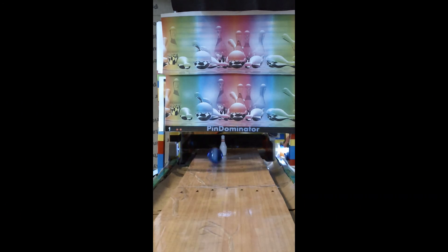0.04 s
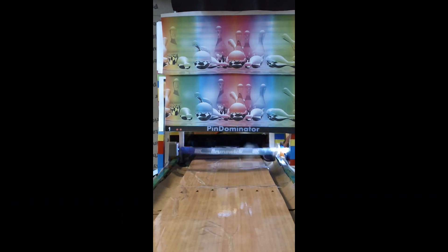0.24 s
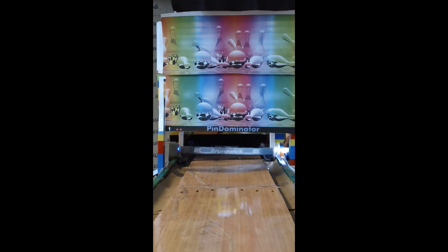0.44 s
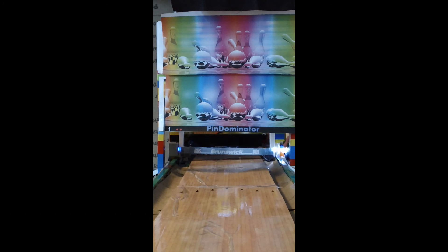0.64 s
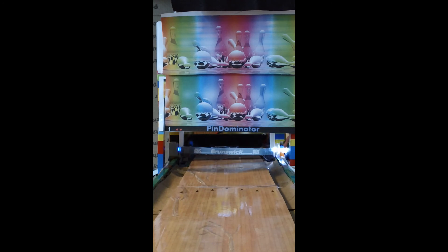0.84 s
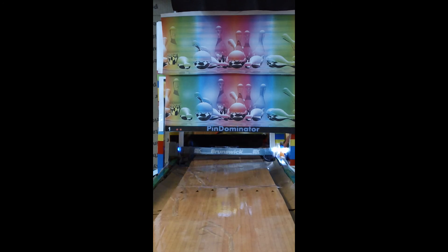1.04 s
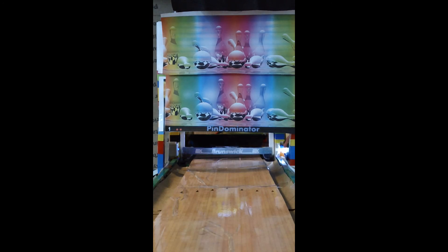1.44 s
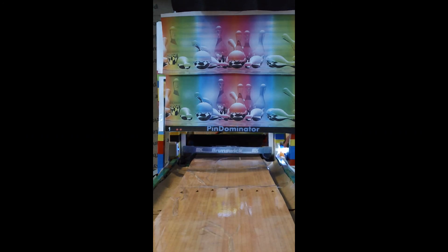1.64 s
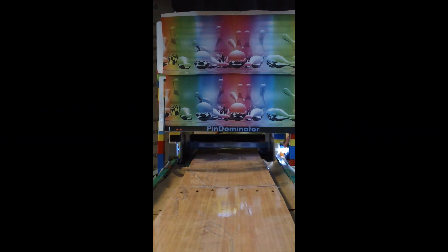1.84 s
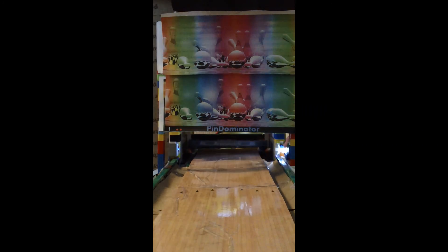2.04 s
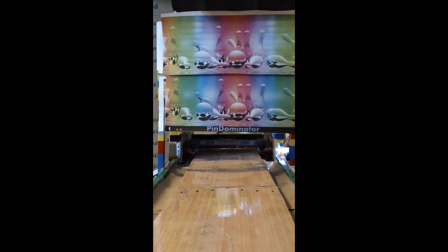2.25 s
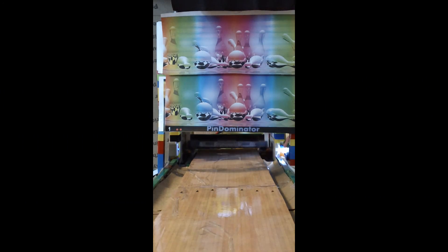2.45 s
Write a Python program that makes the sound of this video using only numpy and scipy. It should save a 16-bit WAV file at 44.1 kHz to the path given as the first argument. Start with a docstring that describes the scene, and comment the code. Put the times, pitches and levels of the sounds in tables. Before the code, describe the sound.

Small pins clack and tumble as a ball strikes them on a toy bowling lane. Next a sweeper knocks down, scrapes along and clicks back into place, shaking the hollow plastic frame. The sound is close, with a short room echo.

```python
"""In a small room, a small ball knocks down the pins of a model bowling lane built of plastic bricks.
Pins clack together and tumble on the wooden deck, and the ball rumbles into the pit.
Then a rake drops, sweeps the deck and latches back, shaking the loose bricks of the frame.
Each hit is a fading tone, a burst of noise or both; rolling and sliding are streams of tiny taps.
The hollow frame rings along, the room adds a short echo, and a soft hiss lies underneath."""
import sys
import numpy as np
from scipy import signal
from scipy.fft import rfft, irfft, next_fast_len
from scipy.io import wavfile
from scipy.ndimage import uniform_filter1d

SR = 44100
rng = np.random.default_rng(int(sys.argv[2]) if len(sys.argv) > 2 else 0)


def generate_wav(sig):
    """Save sig (samples, or channels by samples) to the path in sys.argv[1] as 16-bit PCM at SR."""
    pcm = np.round(np.clip(np.atleast_2d(sig).T, -1, 1) * 32767).astype(np.int16)
    wavfile.write(sys.argv[1], SR, pcm)


N = 110250
AGE = np.arange(8192) / SR  # seconds since a hit began


def from_db(db):
    """Turn decibels into a number to multiply a sound by."""
    return 10 ** (np.asarray(db) / 20)


def unit_level(x):
    """Scale a long sound to an average (rms) level of 1."""
    return x / np.sqrt(np.mean(x ** 2) + 1e-20)


def unit_hit(x):
    """Give a hit the energy of 10 ms of sound at level 1."""
    return x / np.sqrt(np.sum(x ** 2) / (.01 * SR) + 1e-20)


def fade(t60, age=AGE):
    """A fade that falls by 60 dB every t60 seconds."""
    return from_db(-60 * age / t60)


def colour(x, tone):
    """Turn frequencies up or down along a curve of (frequency [Hz], gain [dB]) points."""
    size = 2 * next_fast_len(len(x))
    hz, db = np.transpose(tone)
    grid = np.maximum(np.arange(size // 2 + 1) * SR / size, 1)
    gain = from_db(np.interp(np.log(grid), np.log(hz), db))
    cepstrum = irfft(np.log(gain))
    # keep the filter from sounding before the hit (minimum phase)
    cepstrum[1:size // 2] *= 2
    cepstrum[size // 2 + 1:] = 0
    return irfft(rfft(x, size) * np.exp(rfft(cepstrum)), size)[:len(x)]


def add(out, start_s, sound):
    """Mix a sound in at its start time."""
    i = max(int(start_s * SR), 0)
    out[i:i + len(sound)] += sound[:max(N - i, 0)]


def ring(hz, t60, swell_s=.0001):
    """One pure tone of a struck object: it swells quickly, then fades."""
    return np.sin(2 * np.pi * hz * AGE) * fade(t60) * (1 - np.exp(-AGE / swell_s))


def burst(tone, t60, crack_db=-3):
    """The crack of first contact, then a fading shower of tiny taps."""
    taps = np.sign(rng.standard_normal(len(AGE)))
    loudness = fade(t60) + from_db(crack_db) * fade(t60=.026)
    return unit_hit(colour(taps * loudness, tone))


# tone of the background hiss: (frequency [Hz], gain [dB])
HISS_TONE = [(25, -9), (60, 4.5), (100, 0), (130, 7), (175, -4), (1960, -14.5), (9020, -22.5),
             (15000, -29.5)]


def hiss(start_db=-51, rise_db=5.5, rise_s=(.73, 1.94)):
    """A soft background hiss that grows once the mechanism runs."""
    rise = np.interp(np.arange(N) / SR, rise_s, (0, rise_db))
    return from_db(start_db + rise) * unit_level(colour(rng.standard_normal(N), HISS_TONE))


# ball and pins rolling, rake sliding: (time [s], rumble level [dB], scrape level [dB])
ROLLING_LEVELS = [(0, -32.5, -42), (.08, -54, -68), (.16, -53, -59), (.2, -37.5, -40),
                  (0.282, -22.5, -25.5), (.38, -38.5, -75), (.52, -38.5, -33), (0.704, -39.5, -39.5),
                  (.76, -49, -57), (.95, -30.5, -37), (1.07, -34.5, -39), (1.21, -52.5, -73),
                  (1.37, -39.5, -36.5), (1.44, -40, -61), (1.648, -47, -49.5), (1.756, -29.5, -33),
                  (1.92, -44, -48.5), (1.99, -37.5, -43), (2.13, -41, -44), (2.24, -32, -33.5),
                  (2.33, -46, -67)]
# tones of the lane's rumble and the plastic's scrape: (frequency [Hz], gain [dB])
RUMBLE_TONE = [(60, -27), (105, -12.5), (150, 4.5), (220, 1), (550, 1), (900, -11.5), (2000, -40.5)]
SCRAPE_TONE = [(350, -36.5), (800, 16), (1500, 4.5), (4300, -4), (6500, -12.5), (15000, -60)]


def rolling(taps_per_s=1200, spread_db=4.5):
    """Rolling and sliding: many tiny taps make the lane rumble and the plastic scrape."""
    times, rumble_db, scrape_db = np.transpose(ROLLING_LEVELS)
    out = np.zeros(N)
    for level_db, tone in ((rumble_db, RUMBLE_TONE), (scrape_db, SCRAPE_TONE)):
        sizes = from_db(spread_db * np.minimum(rng.exponential(1, N), 4)) * rng.choice([-1, 1], N)
        taps = sizes * (rng.random(N) < taps_per_s / SR)
        loudness = from_db(np.interp(np.arange(N) / SR, times, level_db))
        out += loudness * unit_level(colour(taps, tone))
    return out


# hard plastic hitting hard plastic: (time [s], pitch [Hz], level [dB])
CLACK_HITS = [(0.1092, 9700, -47), (0.1909, 4900, -30), (0.2898, 4540, -21.5), (.290, 2400, -19.5),
              (.302, 4130, -34), (0.3463, 4540, -25), (.366, 4440, -34), (.387, 5400, -31.5),
              (.399, 4750, -25), (0.464, 1500, -27.5), (0.4858, 4190, -33), (0.53, 4900, -39),
              (.565, 5580, -43.5), (.587, 2050, -39.5), (.601, 1690, -39.5), (0.624, 4300, -40),
              (.654, 1650, -47), (.806, 3850, -47), (.834, 2850, -42), (0.9106, 3290, -20.5),
              (1.122, 4640, -39), (1.347, 3500, -42), (1.364, 3270, -45), (1.689, 4170, -44),
              (1.733, 4200, -39), (1.862, 2600, -44), (1.9863, 4500, -43), (2.2098, 4260, -25.5),
              (2.495, 5960, -28)]
# the tones that ring in one clack: (multiple of the pitch, level [dB])
CLACK_RINGS = [(0.892, 0), (0.997, 0), (1.154, -3)]
# tone of the snap as the parts touch: (frequency [Hz], gain [dB])
SNAP_TONE = [(300, -9), (4500, 0), (8500, -6.5), (11500, -9), (15000, -12.5)]


def clacks(snap_db=-7.5):
    """Pins, ball and bricks meet with a dry snap and a very short ring."""
    out = np.zeros(N)
    for start_s, hz, db in CLACK_HITS:
        ringing = sum(from_db(ring_db) * rng.choice([-1, 1]) * ring(hz * ratio, t60=.0085)
                      for ratio, ring_db in CLACK_RINGS)
        noise = np.sign(rng.standard_normal(len(AGE)))
        snap = colour(noise * fade(t60=.04), SNAP_TONE)
        add(out, start_s, from_db(db) * (unit_hit(ringing) + from_db(snap_db) * unit_hit(snap)))
    return out


# blows on the deck and frame:
# (time [s], thud pitch [Hz], thud [dB], wood knock [dB], brick rattle [dB], bright chatter [dB])
DECK_BLOWS = [(.182, 164, -35, -51, -62, -62), (.275, 281, -22.5, -29, -28.5, -30.5),
              (.285, 231, -21.5, -20, -21.5, -32.5), (.345, 470, -46, -27.5, -22.5, -41),
              (.387, 403, -18.5, -30, -28, -25.5), (0.3983, 403, -17, -20, -21, -30),
              (.421, 350, -23.5, -53, -51, -59), (0.4652, 276, -33, -23, -35, -51),
              (.486, 446, -16, -22, -24, -40), (.564, 820, -33, -34, -33.5, -54),
              (.624, 815, -28.5, -31, -61, -71), (.834, 382, -18, -22, -28.5, -37),
              (.846, 438, -21, -43, -27, -40), (.884, 462, -25.5, -53, -31, -45),
              (0.9104, 483, -17.5, -15.5, -24, -40), (.921, 518, -28, -26, -20, -31.5),
              (.978, 398, -31.5, -29, -28.5, -29), (.988, 415, -20.5, -29, -23.5, -28),
              (1.012, 338, -28, -33, -24, -42), (1.067, 543, -32.5, -25.5, -29.5, -33.5),
              (1.122, 717, -25, -32.5, -36.5, -37.5), (1.376, 723, -29.5, -45, -37.5, -42.5),
              (1.392, 695, -27, -21, -24, -36.5), (1.407, 428, -27.5, -52, -28.5, -36.5),
              (1.481, 231, -40.5, -39, -39, -68), (1.708, 372, -47, -40, -38, -43),
              (1.741, 433, -28.5, -38.5, -44, -47.5), (1.788, 304, -29.5, -46, -49, -46),
              (2.009, 299, -34, -39, -58, -55), (2.055, 559, -27, -39.5, -50, -65),
              (2.1807, 568, -28, -32, -32.5, -51), (2.196, 445, -26, -26, -37, -46),
              (2.210, 212, -33, -23.5, -27.5, -43.5)]
# how the deck shakes around a thud's pitch: (multiple of the pitch, gain [dB])
DECK_TONE = [(.15, -49), (.7, -2), (1, -3.5), (1.5, -3.5), (2.6, -45.5)]
# tones of the wood knock, brick rattle and bright chatter: (frequency [Hz], gain [dB])
KNOCK_TONE = [(350, -24.5), (650, 8.5), (820, 4.5), (1600, 1.5), (2400, -11.5), (5000, -44.5)]
RATTLE_TONE = [(100, -9), (700, 1.5), (1900, 2.5), (2500, 5), (3400, 0), (5000, -1), (7000, -24.5)]
CHATTER_TONE = [(3500, -16), (6200, -2), (9200, 1), (10500, -6.5), (12000, -24), (15000, -11)]


def blows(shake_db=-1):
    """Each blow makes the wooden deck thud and knock, and the loose bricks rattle."""
    out = np.zeros(N)
    for start_s, hz, thud_db, knock_db, rattle_db, chatter_db in DECK_BLOWS:
        note = unit_hit(ring(hz, t60=.044, swell_s=.0024))
        shake = burst([(hz * ratio, db) for ratio, db in DECK_TONE], t60=.057)
        thud = from_db(thud_db) * unit_hit(note + from_db(shake_db) * shake)
        knock = from_db(knock_db) * burst(KNOCK_TONE, t60=.077)
        rattle = from_db(rattle_db) * burst(RATTLE_TONE, t60=.081)
        chatter = from_db(chatter_db) * burst(CHATTER_TONE, t60=.15)
        add(out, start_s, thud + knock + rattle + chatter)
    return out


# small hard parts, probably metal, left ringing: (time [s], pitch [Hz], level [dB])
TINK_HITS = [(.191, 9100, -33.5), (.399, 10060, -27), (0.442, 9050, -34.5), (.528, 9040, -45.5),
             (.586, 9370, -52), (.921, 6520, -32.5), (0.979, 8860, -27), (1.757, 6800, -52),
             (1.802, 6900, -47), (2.123, 9180, -51), (2.151, 9000, -47.5)]


def tinks(pitch_spread=.036, tone_count=24):
    """Small parts ring with high tones so close together that they shimmer as they fade."""
    out = np.zeros(N)
    for start_s, hz, db in TINK_HITS:
        ringing = sum(rng.normal() * ring(hz * (1 + pitch_spread * rng.triangular(-1, 0, 1)), t60=.14)
                      for _ in range(tone_count))
        add(out, start_s, from_db(db) * unit_hit(ringing))
    return out


# the notes of the hollow frame and lane: (pitch [Hz], gain [dB])
FRAME_NOTES = [(130, -2.5), (210, -7), (291, 0), (367, -18), (468, -2), (1389, -1.5), (2467, -22)]


def frame(x, t60=.067):
    """The hollow frame rings along with whatever strikes it."""
    out = x.copy()
    kept = fade(t60, 1 / SR)  # share of the ring left after one sample
    feed_in = np.array([1, 0, -1]) * (1 - kept ** 2) / 2
    for hz, db in FRAME_NOTES:
        feedback = [1, -2 * kept * np.cos(2 * np.pi * hz / SR), kept ** 2]
        out += from_db(db) * signal.lfilter(feed_in, feedback, x)
    return out


def even_noise(loudness, passes=4):
    """Noise that follows a loudness curve, with no frequency standing out."""
    noise = rng.standard_normal(len(loudness)) * loudness
    for _ in range(passes):
        flat = irfft(np.exp(1j * np.angle(rfft(noise))), len(loudness))  # all frequencies equally strong
        local_power = np.abs(uniform_filter1d(flat ** 2, size=128))
        noise = loudness * flat / np.sqrt(local_power + 1e-20)
    return noise


# tone of the room's echo: (frequency [Hz], gain [dB])
ECHO_TONE = [(500, -8), (1500, -6.5), (9000, -2)]


def room(x, low_t60=.241, high_t60=.21, split_hz=4240, swell_s=.0055):
    """The small room adds a short, blurred echo whose high part fades first."""
    age = np.arange(SR // 2) / SR
    build_up = 1 - np.exp(-(age / swell_s) ** 2)
    echo = np.zeros(len(age))
    for side, t60 in (("low", low_t60), ("high", high_t60)):
        band = signal.butter(2, split_hz, side, fs=SR, output="sos")
        echo += signal.sosfilt(band, even_noise(build_up * fade(t60, age)))
    echo /= np.sqrt(np.sum(echo ** 2))
    return signal.fftconvolve(x, colour(echo, ECHO_TONE))[:N]


def scene(lane_db=-1, rolling_db=-3, pins_echo_db=-5):
    """Mix the lane, the pins, their echo and the hiss into one channel."""
    lane = from_db(lane_db) * frame(blows() + from_db(rolling_db) * rolling())
    pins = clacks() + tinks()
    echo = room(lane + from_db(pins_echo_db) * pins)
    return (lane + pins + echo + hiss())[None]


def record(dry):
    """Round the tallest peaks, turn down a narrow band of the high treble, and cut the very top."""
    peak_limit, dip_hz, dip_width_hz, cutoff_hz = .85, 12600, 1800, 15500
    rounded = dry / (1 + (dry / peak_limit) ** 4) ** .25
    dipped = signal.lfilter(*signal.iirnotch(dip_hz, dip_hz / dip_width_hz, fs=SR), rounded)
    return signal.sosfilt(signal.ellip(10, .3, 80, cutoff_hz, fs=SR, output="sos"), dipped)


dry = scene()
out = record(dry)
generate_wav(out)
```